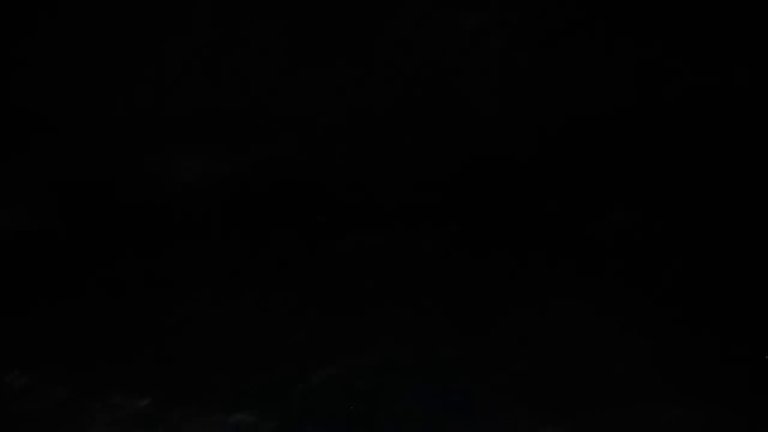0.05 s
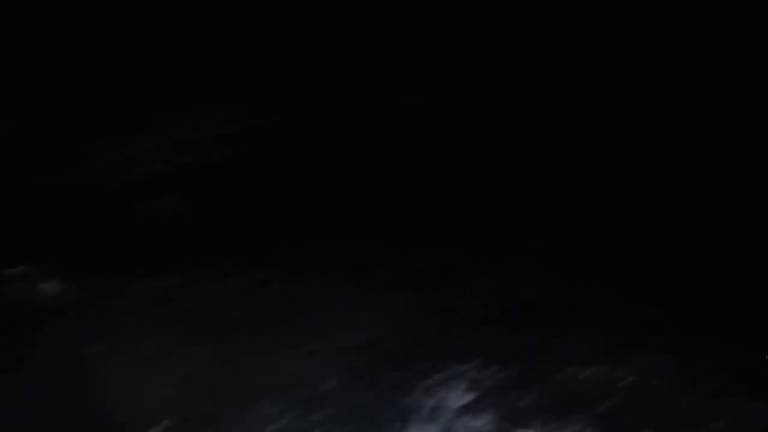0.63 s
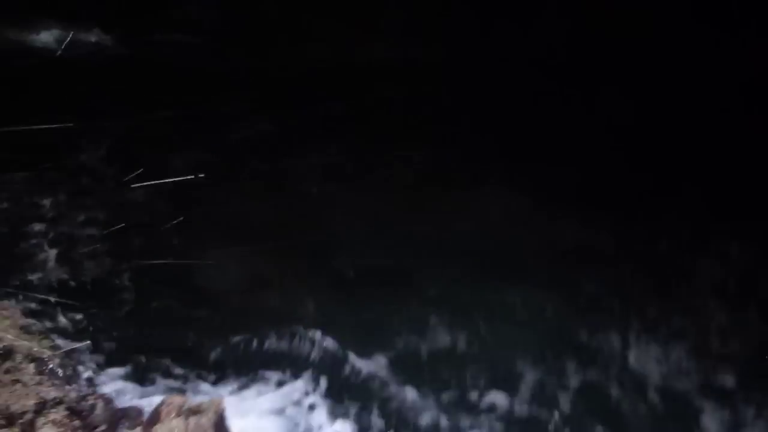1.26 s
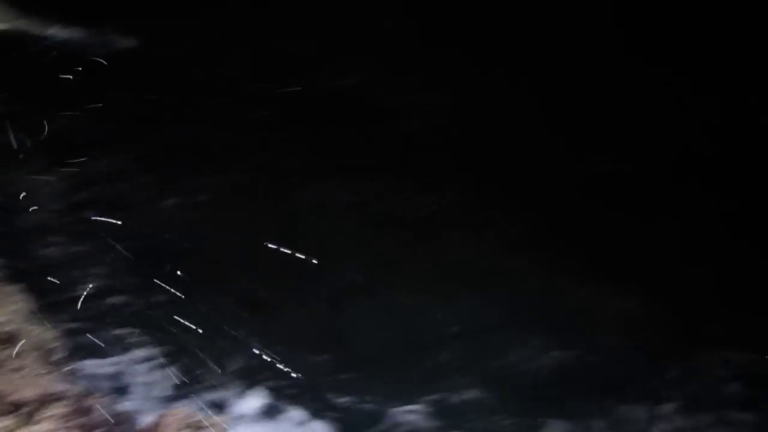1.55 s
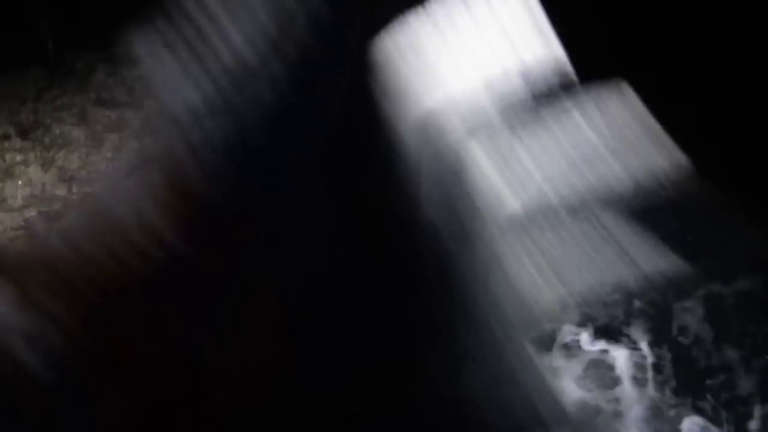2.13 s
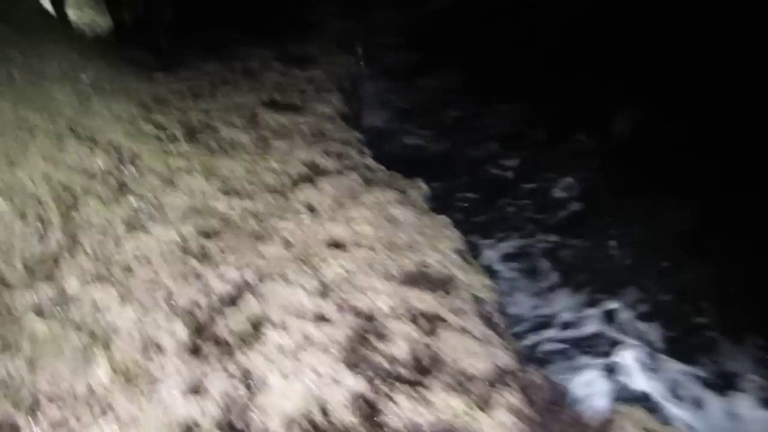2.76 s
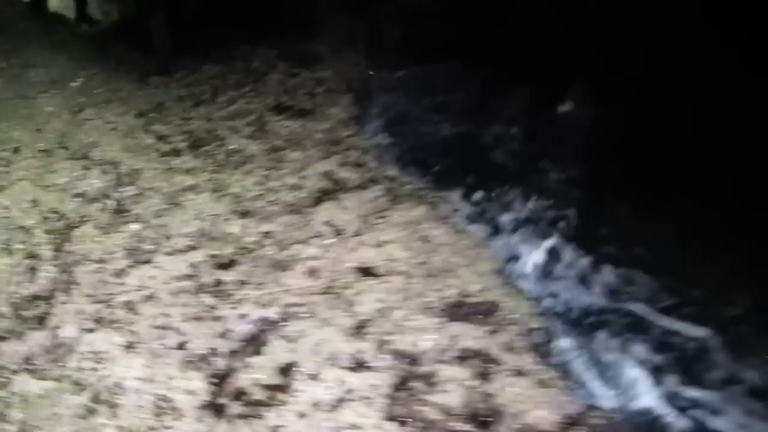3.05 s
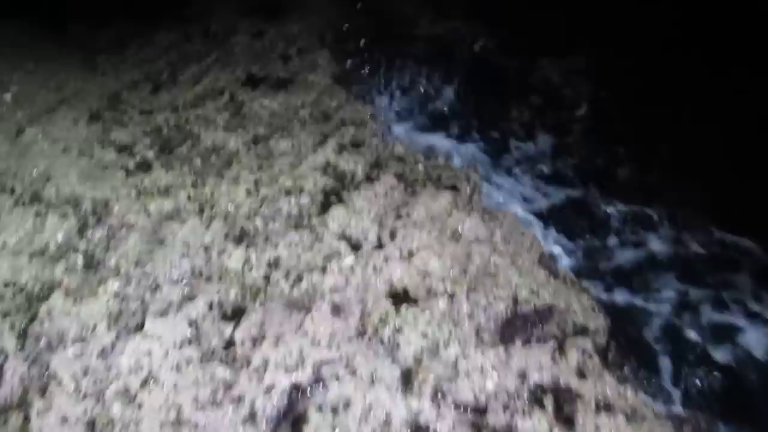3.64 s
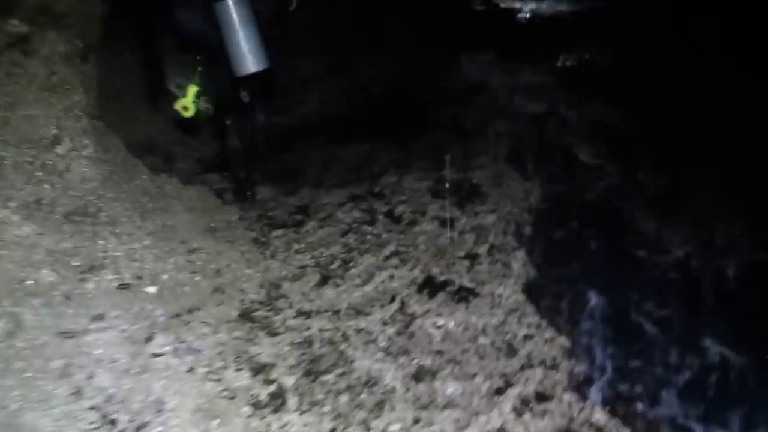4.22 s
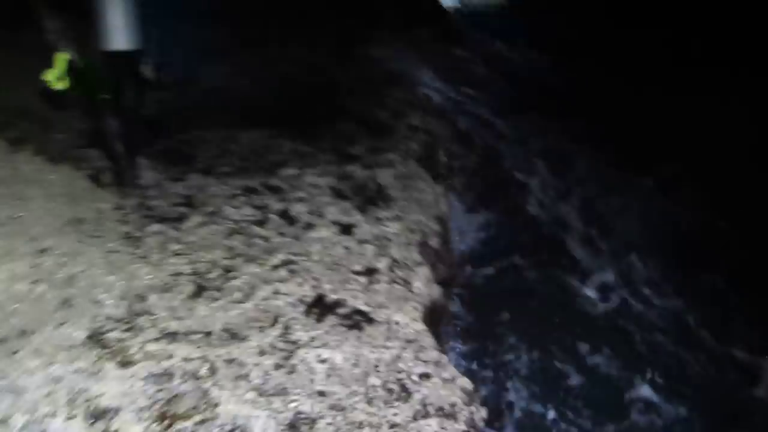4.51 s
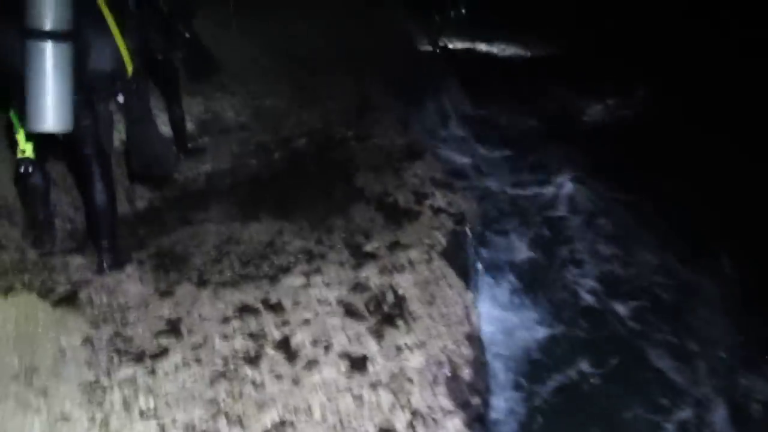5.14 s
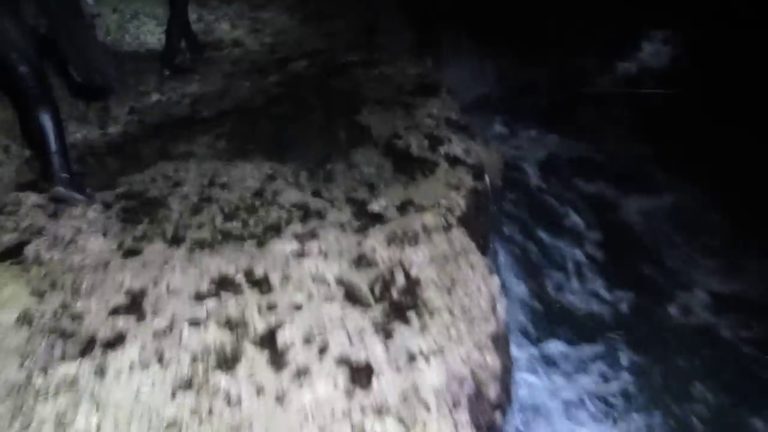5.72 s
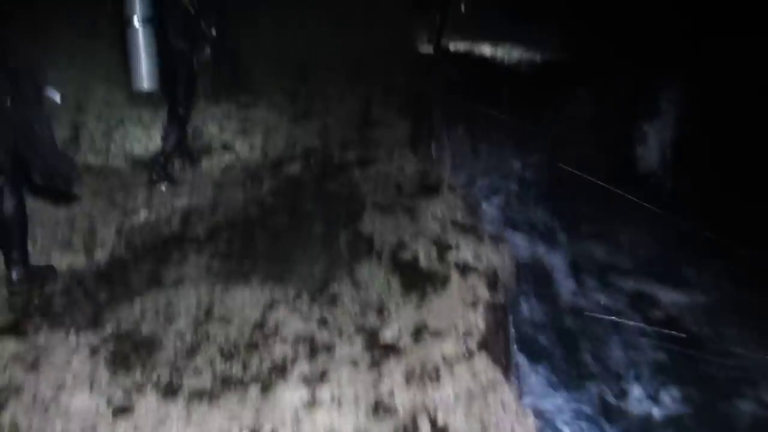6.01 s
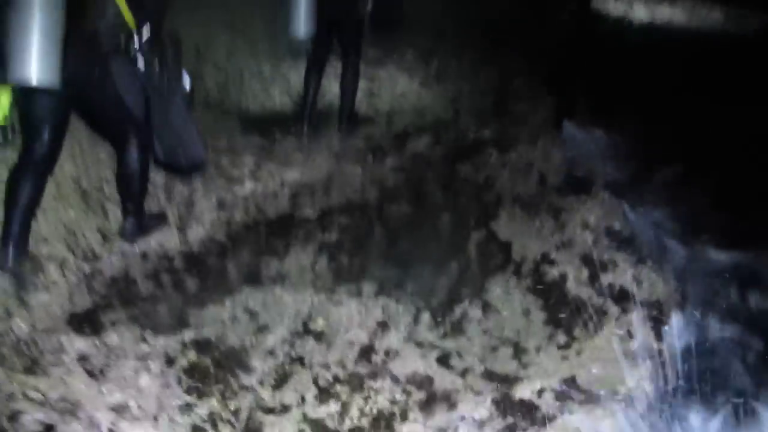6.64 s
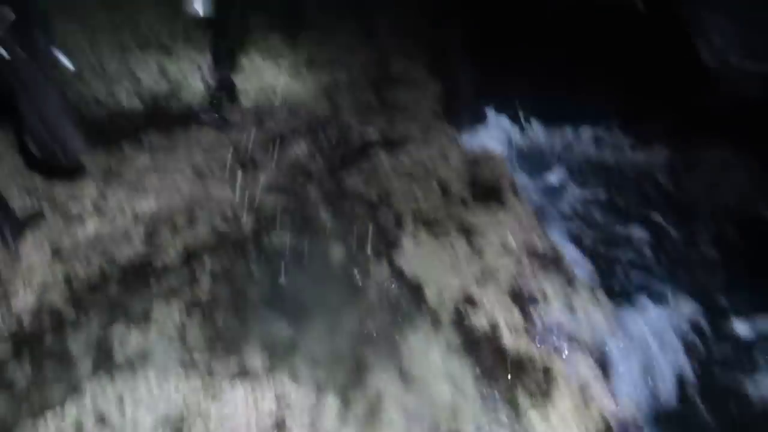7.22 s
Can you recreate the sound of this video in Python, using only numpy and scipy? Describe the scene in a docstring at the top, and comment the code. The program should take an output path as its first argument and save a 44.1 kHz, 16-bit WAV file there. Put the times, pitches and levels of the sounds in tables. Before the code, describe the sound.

Surf gurgles and fizzes against rocks while fingers and diving gear knock, rub and squeak on a jostled waterproof camera housing.

```python
"""A rocky reef at night, heard from a camera in a waterproof housing. Surf gurgles and fizzes with
bubbles, swells and throws up spray; a few drops fall. Fingers and diving gear knock, rub and squeak
on the housing and make its shell ring, while its two microphone openings (ports) colour the surf.
The jostled camera rumbles, with low thuds and buffets from bumps, rubs and moving air. After two of
the hardest knocks the background dips and swells back."""
import sys
import numpy as np
from scipy import signal
from scipy.io import wavfile
from scipy.ndimage import uniform_filter1d

SR = 44100
rng = np.random.default_rng(int(sys.argv[2]) if len(sys.argv) > 2 else 0)


def unload_wav(signal):
    """Save mono or channel-first audio to the path in sys.argv[1] as 16-bit WAV at rate SR, clipped to [-1, 1]."""
    wavfile.write(
        sys.argv[1],
        SR,
        np.round(np.clip(np.atleast_2d(signal).T, -1, 1) * 32767).astype(np.int16),
    )


N = 320607
CUTOFF_HZ = 15900

# Hard blows on the housing. Each row: start in seconds, relative levels in dB of the low thump,
# the middle clack and the high tick, fade time of the chatter in seconds.
HOUSING_BLOWS = [(1.005, -37, -32, -54, .004), (1.048, -12.5, -27, -13, 0.0053),
                 (1.056, -12, -24, -19, 0.0026), (1.0695, -20, -14, -6, 0.0038),
                 (1.108, -20.5, -38.5, -34, 0.0082), (1.492, -46, -55.5, -72.5, 0.015),
                 (1.637, -46, -53.5, -63, 0.0041), (1.707, -54, -56, -57, 0.0022),
                 (1.789, -40.5, -45.5, -49, 0.009), (1.8261, -28.5, -29, -37, 0.0036),
                 (1.898, -63, -54, -48, 0.0076), (1.9621, -76, -70, -44, 0.013),
                 (2.058, -73, -67, -42.5, 0.0034), (2.267, -28, -49.5, -51.5, 0.0069),
                 (2.425, -33.5, -68, -58, 0.0099), (2.493, -27, -35.5, -52, 0.0028),
                 (2.5262, -35.5, -33, -63, 0.0074), (2.8901, -31, -19.5, -51, 0.0016),
                 (2.9555, -21, -14, -20.5, 0.0027), (2.996, -32.5, -29, -39.5, 0.0035),
                 (3.042, -26.5, -17.5, -56, 0.0025), (3.098, -41, -34.5, -62, 0.014),
                 (3.1243, -34.5, -29, -51, 0.00587), (3.157, -22.5, -4.5, -30, 0.0012),
                 (3.2466, -53, -39, -50.5, 0.011), (3.2887, -48.5, -43.5, -51, 0.0089),
                 (3.465, -40, -33, -58.5, 0.0066), (3.477, -41.5, -22, -41, 0.0085),
                 (3.5505, -49, -37, -51.5, .004), (3.6386, -44, -27.5, -41, 0.0047),
                 (3.825, -51, -52, -59, .0045), (3.8558, -41.5, -37, -57, .005),
                 (3.973, -57, -33, -42.5, 0.0044), (4.208, -42, -33, -57, .005),
                 (4.2485, -24.5, -25, -47, 0.0028), (4.6421, -25, -25.5, -48.5, 0.0046),
                 (5.009, -40.5, -49, -51.5, 0.0077), (5.079, -51, -43.5, -58, .0065),
                 (5.203, -32.5, -51.5, -51, 0.0067), (5.303, -34, -42.5, -52, 0.011),
                 (5.315, -29.5, -34.5, -51, 0.0025), (5.578, -28, -30, -37, 0.0057),
                 (5.615, -34.5, -47, -62, 0.0064), (6.311, -38.5, -33.5, -50, 0.012),
                 (6.474, -48, -27.5, -49, 0.006), (6.861, -30, -38, -54, 0.006),
                 (6.879, -30.5, -38, -54, 0.0049), (6.991, -36, -33, -55, 0.019)]
# How hard the camera is jostled. Each row: time in seconds, level in dB.
JOSTLING = [(0.0, -48.5), (0.67, -43.5), (1.64, -58), (2.24, -45), (2.27, -33.5), (2.59, -46), (2.63, -37),
            (3.08, -40), (3.38, -60.5), (3.79, -40), (4.41, -44.5), (4.68, -45), (4.82, -52), (6.3, -49.5),
            (6.32, -40), (6.94, -50.5), (7.03, -37), (7.27, -46)]


def from_db(db):
    """Turn decibels into a factor to multiply by."""
    return 10 ** (np.asarray(db) / 20)


def rms_one(x):
    """Scale a sound so that its average strength (rms) is 1."""
    return x / np.sqrt(np.mean(x ** 2) + 1e-20)


def in_time(points):
    """Join (seconds, value) points with straight lines, one value for each sample."""
    return np.interp(np.arange(N) / SR, *np.transpose(points))


def at_hz(points, hz):
    """Read a curve of (Hz, value) points at one pitch, with octaves evenly spaced."""
    pitches, values = np.transpose(points)
    return np.interp(np.log(hz), np.log(pitches), values)


def drift(rate_hz):
    """A smooth random wobble, about 1 in size; a higher rate wobbles faster."""
    step, warm_up = 40, 2000
    r = np.exp(-2 * np.pi * rate_hz * step / SR)
    noise = rng.standard_normal(N // step + warm_up + 2)
    slow = signal.lfilter([1], [1, -2 * r, r * r], noise)[warm_up:]
    return np.interp(np.arange(N) / step, np.arange(len(slow)), rms_one(slow))


def resonate(x, modes):
    """Ring a sound through modes (natural tones), each a pitch in Hz, width in Hz and level in dB."""
    out = 0
    for k, (hz, width, db) in enumerate(modes):
        r = np.exp(-np.pi * width / SR)
        b = (1 - r * r) / 2 * np.array([1, 0, -1])
        a = [1, -2 * r * np.cos(2 * np.pi * hz / SR), r * r]
        out = out + (-1) ** k * from_db(db) * signal.lfilter(b, a, x + 1e-18)
    return out


def band_pass(x, band_hz):
    """Keep the part of a sound between two pitches."""
    return signal.sosfilt(signal.butter(2, band_hz, "band", fs=SR, output="sos"), x)


def add(track, start_s, sound):
    """Mix a sound in at a given time."""
    start = max(round(start_s * SR), 0)
    track[:, start:start + sound.shape[1]] += sound[:, :N - start]


def banded_noise(spectrum, flicker_db, flicker_hz):
    """Stereo noise in half-octave bands, each flickering by itself."""
    # How alike the two ports sound. Each row: pitch in Hz, likeness from -1 (opposite) to 1 (same).
    likeness = [(100, 0.94), (500, .88), (850, 0.28), (1200, 1), (1800, 0.41), (2800, -0.58), (4200, -0.2),
                (6200, -0.32), (8500, 0.0073), (14000, 0.34)]
    out, white = 0, rng.standard_normal((2, 2, N))
    top_hz = min(spectrum[-1][0], CUTOFF_HZ)
    edges = 2 ** np.arange(np.log2(spectrum[0][0]), np.log2(top_hz) + .4, .5)
    for k, (low, high) in enumerate(zip(edges, edges[1:])):
        mid, side = band_pass(white[k % 2], [low, high])
        hz = np.sqrt(low * high)
        alike = np.clip(at_hz(likeness, hz), -1, 1)
        gain = from_db(at_hz(spectrum, hz) + flicker_db * drift(flicker_hz))
        out = out + gain * (np.sqrt(1 + alike) * mid + np.sqrt(1 - alike) * side * [[1], [-1]])
    return rms_one(out)


def buffeting(draught_db=-11.5):
    """Bumps, rubs and moving air, with the draught of the moving camera, make a low, lumpy noise."""
    # Low thuds and buffets. Each row: peak time, rise time and fall time in seconds, level in dB.
    buffets = [(.625, 0.053, 0.022, -24.5), (0.951, 0.33, 0.2, -35.5), (1.4, .008, 0.029, -23.5),
               (2.271, .005, 0.015, -32.5), (2.55, 0.048, 0.075, -38.5), (2.926, 0.026, 0.022, -31.5),
               (3.96, 0.032, 0.029, -37.5), (4.655, 0.0044, 0.021, -34.5), (5.03, .02, 0.053, -42),
               (5.63, 0.022, 0.044, -38), (6.36, 0.28, 0.12, -44.5)]
    # Tone of the buffeting. Each row: pitch in Hz, relative level in dB.
    buffet_spectrum = [(40, -9), (70, 5.5), (105, 4.5), (150, -6), (210, -24), (500, -41.5)]
    t, lumps = np.arange(0, N, 40) / SR, 0
    for peak, rise, fall, db in buffets:
        from_peak = np.maximum((peak - t) / rise, (t - peak) / fall)
        lumps = lumps + from_db(db) * np.exp(-from_peak.clip(0, 20))
    draught = from_db(in_time(JOSTLING) + draught_db)
    strength = np.hypot(np.interp(np.arange(N) / SR, t, lumps), draught)
    return strength * banded_noise(buffet_spectrum, flicker_db=1.0, flicker_hz=6.9)


def ports(stereo):
    """Each microphone port boosts some pitches and swallows others."""
    # Peaks and notches of each port. Each row: pitch in Hz, width in Hz, boost or cut in dB.
    left_port = [(467.4, 25, 9), (810, 38, 0.5), (1241, 57, 5.5), (1517, 260, -12), (1755, 81, 13.5),
                 (2050, 96, 10), (2430, 280, -6), (3123, 250, 15), (5370, 170, 9), (6150, 86, 8),
                 (7320, 140, 3), (9300, 23000, -3)]
    right_port = [(435, 16, 6.5), (650, 190, 1.5), (791, 18, -9.5), (1240, 120, 10.5), (1440, 440, -16),
                  (1955, 84, 13.5), (2552, 180, 12), (3160, 270, 9.5), (5600, 200, -1.5), (7050, 300, 3.5),
                  (8800, 110, 5)]
    out = []
    for channel, port in zip(stereo, (left_port, right_port)):
        hz, width, db = np.transpose(port)
        gain, damp = from_db(db / 2), np.pi * width / SR
        tuning = -2 * np.cos(2 * np.pi * hz / SR)
        boost, cut = damp * gain, damp / gain
        filters = np.stack([1 + boost, tuning, 1 - boost, 1 + cut, tuning, 1 - cut], axis=1)
        out.append(signal.sosfilt(filters / (1 + cut)[:, None], channel + 1e-18))
    return np.array(out)


def bubbles(per_s, low_hz, high_hz, cycles, spread_db, pitches=16):
    """Bubbles of random strength ring for a few cycles, each pitch from its own direction."""
    sizes = from_db(spread_db * np.minimum(rng.exponential(1, N), 4)) * rng.choice([-1, 1], N)
    clicks = sizes * (rng.random(N) < per_s / SR)
    out, pitch_index = 0, rng.integers(0, pitches, N)
    for k, hz in enumerate(np.geomspace(low_hz, high_hz, pitches)):
        ring = resonate(clicks * (pitch_index == k), [(hz, hz / cycles, 0)]) / hz
        out = out + ring * from_db(rng.normal(0, 2) * np.array([[1], [-1]]))
    return rms_one(out)


def surf(full_surge_db=-44.5, full_water_db=-43, water_follows=0.78):
    """Churning water gurgles and its foam fizzes, both following the waves; spray slaps the rock."""
    # A small wave, then a long swell that breaks. Each row: time in seconds, strength in dB.
    surge = [(0.0, -63.5), (0.3, -54.5), (0.6, -53), (1.05, -55.5), (1.55, -61.5), (2.15, -62),
             (2.35, -54.5), (3.0, -57), (3.7, -65), (4.1, -57.5), (4.8, -60.5), (5.5, -52), (5.87, -43.5),
             (6.2, -46.5), (6.5, -42.5), (6.75, -46.5), (7.27, -49)]
    # Tone of the water and of the foam. Each row: pitch in Hz, relative level in dB.
    water_spectrum = [(60, -3), (130, -11), (250, 0), (450, -5), (800, -2.5), (1200, 3), (1700, -9.5),
                      (2600, -38.5), (5000, -64.5)]
    foam_spectrum = [(700, -18), (1500, -5.5), (2600, 0.5), (4200, -1.5), (7000, -2), (9000, -13),
                     (12000, -22), (16000, -34)]
    # Slaps of spray. Each row: start in seconds, fade time in seconds, strength in dB.
    splashes = [(5.378, 0.0047, -32.5), (6.545, 0.05, -38.5), (6.829, 0.0072, -26)]
    surge_db = in_time(surge)
    water_db = full_water_db + water_follows * (surge_db - full_surge_db)
    gurgle = from_db(-11) * bubbles(per_s=450, low_hz=400, high_hz=1900, cycles=8, spread_db=3.0)
    fizz = from_db(-10) * bubbles(per_s=1500, low_hz=2000, high_hz=8000, cycles=4, spread_db=5.0)
    water = ports(banded_noise(water_spectrum, flicker_db=2.6, flicker_hz=15) + gurgle)
    foam = ports(banded_noise(foam_spectrum, flicker_db=2.5, flicker_hz=10) + fizz)
    t, spray = np.arange(N) / SR, 0
    for start, fade, db in splashes:
        age = np.maximum(t - start, 0)
        spray = spray + from_db(db) * (1 - np.exp(-age / 0.0053)) * np.exp(-age / fade)
    return from_db(water_db) * rms_one(water) + (from_db(surge_db + 2.5) + spray) * rms_one(foam)


def thuds(level_db=-43, follows_thump=0.5, fade_s=0.03):
    """The whole camera shakes briefly after each knock, more after a heavier one."""
    # Low tones of the camera. Each row: pitch in Hz, width in Hz, relative level in dB.
    camera_modes = [(145, 90, 2), (215, 58, -6)]
    starts, thump_db = np.transpose(HOUSING_BLOWS)[:2]
    strengths = from_db(level_db + follows_thump * (thump_db + 29.5))
    blows = np.bincount((starts * SR).astype(int), strengths ** 2, N)[:N]
    power = signal.lfilter([1], [1, -np.exp(-2 / (fade_s * SR))], blows + 1e-18)
    shake = resonate(resonate(rng.standard_normal(N), camera_modes), [(165, 200, 0)])
    return np.sqrt(power) * rms_one(shake)


def background_dip(onset_s=0.015):
    """The background's volume drops quickly after two hard knocks and slowly swells back."""
    # Each row: start in seconds, depth it heads for in dB, recovery time in seconds.
    dips = [(1.125, 18.5, 0.34), (3.191, 9.5, 0.37)]
    t, db = np.arange(N) / SR, 0
    for start, depth_db, recovery in dips:
        age = np.maximum(t - start, 0)
        db = db - depth_db * (1 - np.exp(-age / onset_s)) / (1 + (age / recovery) ** 2)
    return from_db(db)


def drips(fade_s=0.0019, chirp=1.2):
    """A drop traps a tiny bubble whose pitch rises as it dies away."""
    # Falling drops. Each row: start in seconds, pitch in Hz, level in dB.
    drops = [(.458, 4160, -45), (.489, 4280, -38), (0.52, 4300, -37), (.687, 7200, -39),
             (4.832, 4660, -42.5)]
    out, t = np.zeros((2, N)), np.arange(SR // 20) / SR
    for start, hz, db in drops:
        plink = np.sin(2 * np.pi * hz * t * (1 + chirp * t) + rng.uniform(0, np.pi, (2, 1)))
        add(out, start, from_db(db) * plink * np.exp(-t / fade_s))
    return out


def rumble(hz=40):
    """The jostled camera shudders at one low pitch."""
    shudder = resonate(resonate(rng.standard_normal(N), [(hz, 8, 0)]), [(hz, 30, 0)])
    steady = shudder / np.sqrt(uniform_filter1d(shudder ** 2, SR // 10) + 1e-12)
    return from_db(in_time(JOSTLING)) * steady


def sleeve(drag_db=-5.5, grit_db=2.0):
    """A sleeve hisses past, closer to the right port, and drags dully on the shell."""
    # One brush of the fabric. Each row: time in seconds, level in dB.
    brush = [(2.262, -100), (2.278, -40.5), (2.32, -41.5), (2.385, -37), (2.422, -42.5), (2.435, -56),
             (2.47, -100)]
    # Tone of the hiss. Each row: pitch in Hz, relative level in dB.
    fabric_spectrum = [(2400, -13.5), (3800, -6), (5600, 3.5), (8000, -7), (11000, -19), (16000, -19.5)]
    hiss = banded_noise(fabric_spectrum, flicker_db=1.5, flicker_hz=40)
    hiss = hiss * from_db(grit_db * drift(150)) * from_db([[-1], [1]])
    drag = rms_one(resonate(rng.standard_normal(N), [(487, 110, -0.22), (730, 170, -0.78)]))
    return from_db(in_time(brush)) * (hiss + from_db(drag_db) * drag)


def shell(force, levels_db, span_s, vary_db, crack_db=-9.0):
    """Pushes at two points make the shell ring with a low thump, a middle clack and a high tick."""
    # The shell's natural tones. Each row: pitch in Hz, width in Hz, relative left and right levels
    # in dB, phase shift between the ports in radians.
    thump_modes = [(165, 110, -11, -11, 0), (360, 70, -11, -12, 0), (486, 42, 0, -1.5, 0),
                   (655, 90, -6, -6, -.2)]
    clack_modes = [(540, 200, -19, -20, 0), (700, 130, -15, -13, -.2), (880, 110, -7, -13, -.9),
                   (1070, 130, -3, -5, .1), (1222, 62, 0, -1, 0), (1390, 130, -16, -18, -.2),
                   (1745, 48, -5, -17, .3), (1982, 48, -14, -9, -.2), (2500, 300, -33, -24, -2.8)]
    tick_modes = [(3070, 160, -6.5, -5, 3), (3690, 200, -1.5, -8.5, -2.5), (4430, 540, -6.5, -10.5, -1.6),
                  (4610, 180, -6.5, -2.5, -.5), (5200, 420, 2, 2.5, 2), (5930, 180, 2.5, -1.5, 3),
                  (6160, 200, -4, -6.5, 2), (6836, 310, -4, -5.5, 1.5), (6954, 280, -6.5, 0, 0.5),
                  (7740, 110, -2, -0.5, 2.4), (8350, 200, -15.5, -1.5, -1.2),
                  (10040, 2200, -18.5, -3.5, 0.77), (13120, 3000, -23.5, -5.5, 2.5)]

    def leveled(sound, band_hz, db):
        """Keep one band and set its level over the first span_s seconds."""
        sound = band_pass(sound, np.minimum(band_hz, CUTOFF_HZ))
        return from_db(db) * sound / np.sqrt(np.mean(sound[:, :round(span_s * SR)] ** 2) + 1e-20)

    thump_db, clack_db, tick_db = levels_db
    # a soft contact has little tick and also a duller top
    tick_top_hz = 8000 * from_db(0.15 * np.clip(tick_db - clack_db + 17, -10, 25))
    # a padded blow is mostly thump and hardly reaches the upper clack tones
    clack_top_hz = 1450 * from_db(0.24 * np.clip(clack_db - thump_db, 0, 18))
    bands = (90, 7200), (480, clack_top_hz), (2700, tick_top_hz)
    # the crack of the contact itself reaches the ports without ringing
    crack = np.array([force[0] + .5 * force[1], force[0] - .5 * force[1]])
    out = leveled(crack, (450, 3600), crack_db + tick_db + .4 * (clack_db - tick_db))
    for modes, band_hz, db in zip((thump_modes, clack_modes, tick_modes), bands, levels_db):
        sound = 0
        for k, (hz, width, left_db, right_db, phase) in enumerate(modes):
            # the place of contact decides how strongly each tone rings
            push = force[0] + rng.uniform(-1.7, 1) * force[1]
            strength = (-1) ** k * from_db(vary_db * rng.standard_normal()) * np.sqrt(width)
            pole = np.exp((-np.pi * width + 2j * np.pi * hz) / SR)
            ring = signal.lfilter([strength], [1, -pole], push + 1e-18)
            left = from_db(left_db) * ring.real
            right = from_db(right_db) * (ring * np.exp(-1j * phase)).real
            sound = sound + np.array([left, right])
        out = out + leveled(sound, band_hz, db)
    return out


def strap(start_s=1.548, end_s=1.733, ribs=17):
    """A ribbed strap slides over an edge: one faint tick for each rib, growing louder."""
    out, t = np.zeros((2, N)), np.arange(SR // 20) / SR
    for rib_s, db in zip(np.linspace(start_s, end_s, ribs), np.linspace(-61, -55, ribs)):
        force = rng.standard_normal((2, len(t))) * np.exp(-t / .0015)
        start = rib_s + rng.normal(0, .001)
        add(out, start, shell(force, (db - 14, db - 10, db), span_s=.005, vary_db=2.0))
    return out


def squeaks():
    """Wet rubber keeps the shell singing: a hollow main tone, and narrow upper ones at each port."""
    # Each row: start and length in seconds, level of the upper tones and of the main tone in dB.
    rubber_slides = [(0.888, .15, -45, -55), (2.735, 0.075, -37, -50), (2.948, 0.028, -22.5, -29),
                     (3.16, 0.04, -37, -36.5), (3.595, 0.13, -57, -36)]
    out = np.zeros((2, N))
    for start, length, upper_db, main_db in rubber_slides:
        size = round(length * SR)
        friction = rng.standard_normal(size + 2000)  # extra samples let the ringing build up
        upper = np.array([resonate(friction, [(1800, 7.5, 15.5), (1910, 60, -5.5)]),
                          resonate(friction, [(1750, 22, -14.0), (2005, 63, -10)])])
        main = resonate(resonate(friction, [(1210, 80, 0)]), [(1180, 350, 0)])
        sound = from_db(upper_db) * rms_one(upper[:, -size:]) + from_db(main_db) * rms_one(main[-size:])
        add(out, start, sound * signal.windows.tukey(size, .6))
    return out


def rubs(unevenness=.4, slip_spread_db=1.5, grit=0.12, edge_db=-11.0, doubling_db=18):
    """A rub sticks and slips on the shell: a run of tiny uneven blows that grows and lets go."""
    # Each row: start, rise time and fall time in seconds, relative thump, clack and tick levels in dB.
    strokes = [(0.168, 0.012, 0.028, -46.5, -41.5, -57.5), (0.502, 0.13, 0.019, -38.5, -37, -55),
               (.72, 0.096, .017, -47.5, -45, -64), (.879, 0.14, 0.02, -40, -43.5, -58),
               (1.265, 0.082, 0.021, -66, -59, -66.5), (1.376, 0.0069, 0.035, -30, -27, -38),
               (1.394, 0.012, 0.016, -32, -25.5, -28.5), (1.429, 0.0029, .013, -53, -35.5, -41.5),
               (2.555, 0.053, 0.091, -40, -50.5, -51.5), (2.723, 0.056, 0.024, -46.5, -40, -50.5),
               (2.829, 0.036, 0.069, -42, -39, -52), (2.935, 0.019, 0.044, -34.5, -33, -50.5),
               (2.985, 0.024, 0.015, -42, -25.5, -47), (3.03, 0.013, 0.027, -33.5, -30.5, -69),
               (3.128, .018, 0.0056, -41, -29.5, -47.5), (3.163, 0.012, .014, -56.5, -27, -59),
               (3.593, 0.057, 0.069, -60, -46, -65), (3.749, 0.058, 0.069, -52.5, -51.5, -66),
               (3.901, 0.078, 0.021, -45, -41.5, -56.5), (4.176, 0.06, .013, -54.5, -38, -54.5),
               (4.225, 0.02, 0.012, -33.5, -24.5, -46), (4.343, 0.084, 0.025, -52, -48.5, -63.5)]
    out, t = np.zeros((2, N)), np.arange(SR // 4) / SR
    for start, rise, fall, thump, clack, tick in strokes:
        length = rise + fall
        slips_per_s = 720 * 2 ** ((thump + 43) / doubling_db)  # a firmer rub slips faster
        pressure = from_db(np.interp(t, [0, rise, length], [edge_db, 0, edge_db])) * (t < length)
        gaps, sizes, signs = rng.standard_normal((3, 2000))
        slip_at = (np.cumsum(np.exp(unevenness * gaps)) / slips_per_s * SR).astype(int)
        slips = np.bincount(slip_at, from_db(slip_spread_db * sizes) * np.sign(signs), len(t))[:len(t)]
        force = np.array([slips, slips * rng.standard_normal(len(t))])
        force += grit * rng.standard_normal((2, len(t)))
        levels_db = thump - 2, clack, tick + .5
        add(out, start, shell(force * pressure, levels_db, span_s=length, vary_db=4.5))
    return out


def knocks(chatter=0.073):
    """One sharp blow on the shell, then the touching surfaces chatter for a few milliseconds."""
    out, t = np.zeros((2, N)), np.arange(SR // 10) / SR
    for start, thump, clack, tick, fade in HOUSING_BLOWS:
        force = chatter * rng.standard_normal((2, len(t))) * np.exp(-t / fade)
        force[0, 0] += 1  # the blow itself
        add(out, start, shell(force, (thump - 3.5, clack, tick), span_s=0.0051, vary_db=1.45))
    return out


def scene():
    """Sea and low buffeting behind, with the handling of the camera close in front."""
    handling = knocks() + rubs() + squeaks() + strap() + sleeve() + rumble()
    background = (surf() + buffeting() + thuds()) * background_dip()
    return background + drips() + handling


def record(dry):
    """The hardest knocks overload and are clipped; the highest treble is cut."""
    treble_cut = signal.cheby2(12, 60, CUTOFF_HZ + 600, fs=SR, output="sos")
    return signal.sosfilt(treble_cut, np.clip(dry, -1, 1))


dry = scene()
out = record(dry)
unload_wav(out)
```